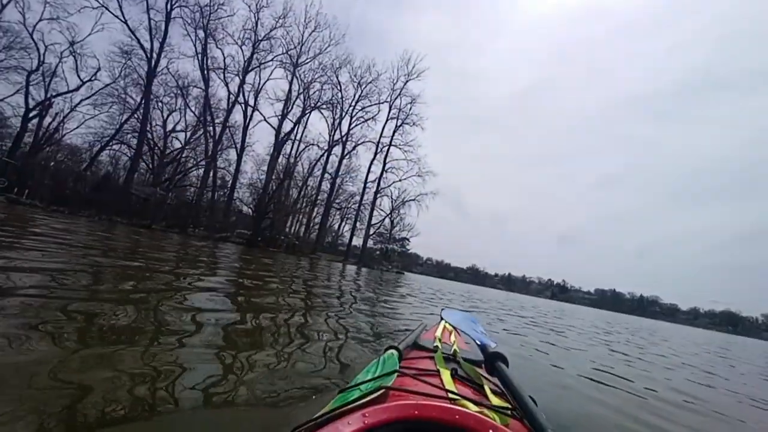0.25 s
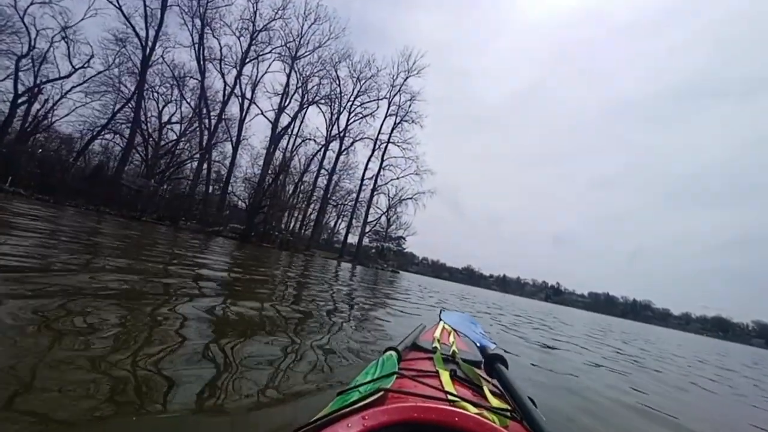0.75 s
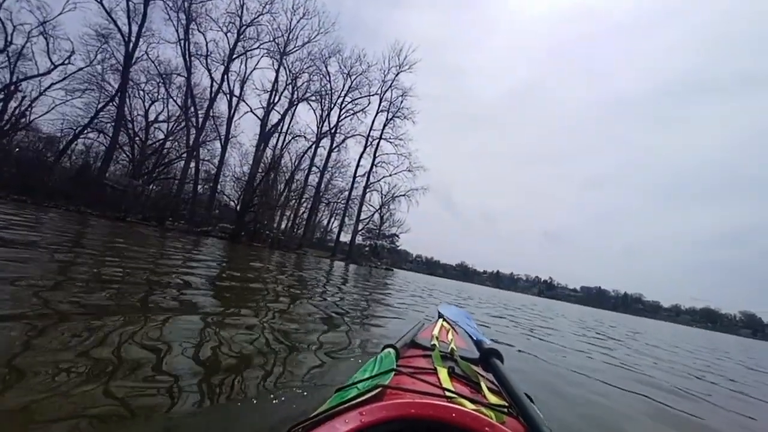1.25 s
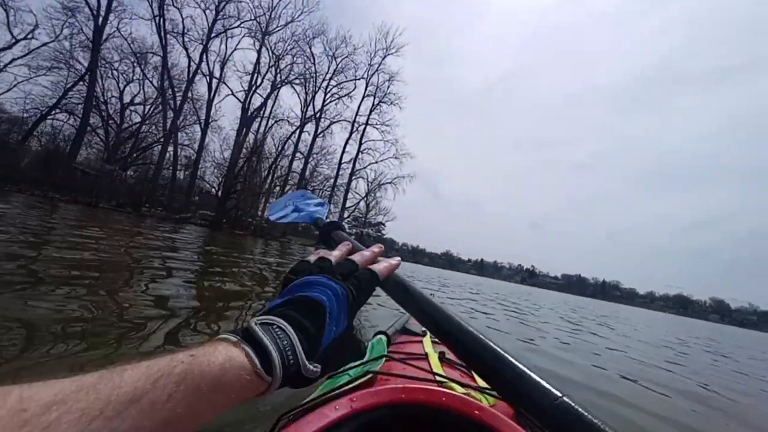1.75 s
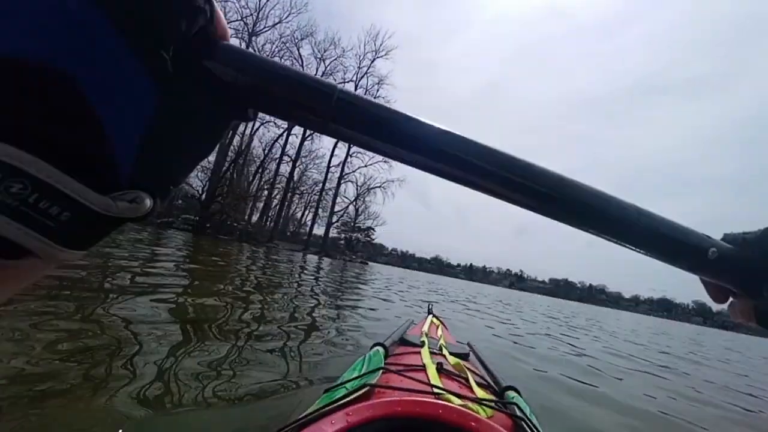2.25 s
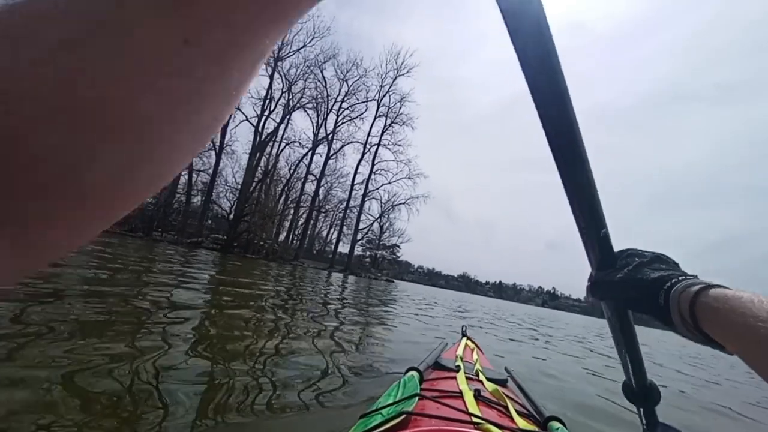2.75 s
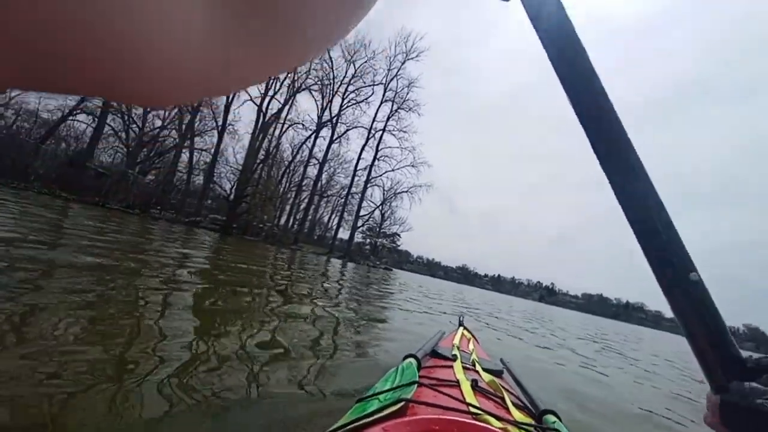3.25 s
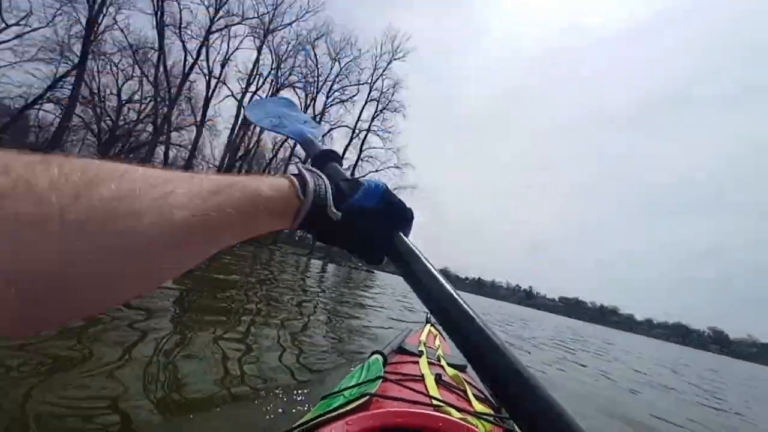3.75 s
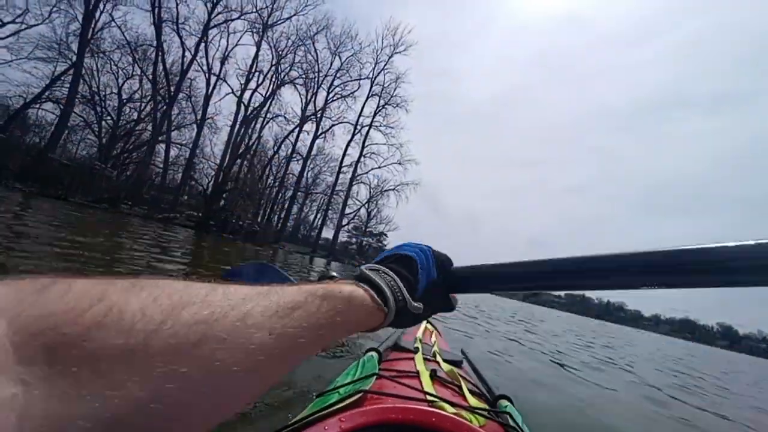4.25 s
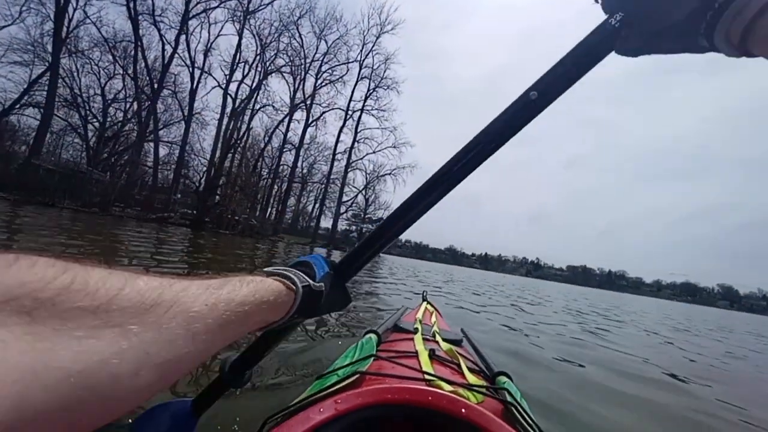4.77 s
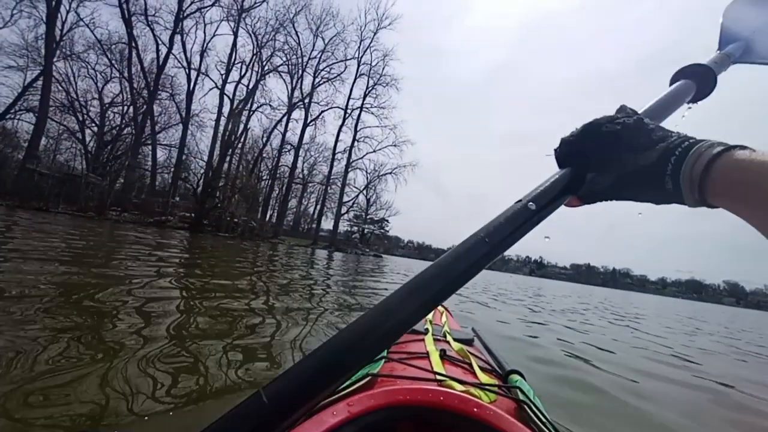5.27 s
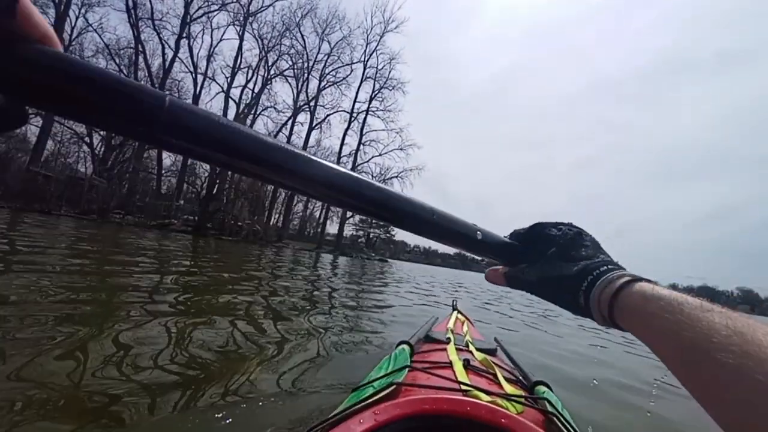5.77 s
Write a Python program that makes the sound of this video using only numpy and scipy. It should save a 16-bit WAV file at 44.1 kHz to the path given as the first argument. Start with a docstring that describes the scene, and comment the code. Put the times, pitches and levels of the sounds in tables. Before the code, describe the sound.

One sharp, rattling knock on a kayak hull, followed by soft paddle strokes with bubbling and drips, rustling clothes and a brief bird call.

```python
"""A kayak on a calm lake, heard by two small microphones on either side of the paddler's head.
From the start, clothing rustles and ticks over a far, low rumble. The paddle shaft soon bumps the plastic
deck, then knocks it hard and rattles. Near 2.7 s the blade enters on the left, splashing, gurgling and
dripping, while a bird calls a high note and a lower one from the shore trees.
Near 4.9 s a second stroke begins on the right."""
import sys
import numpy as np
from scipy import signal
from scipy.fft import rfft, irfft
from scipy.io import wavfile
from scipy.ndimage import uniform_filter1d

SR = 44100
rng = np.random.default_rng(int(sys.argv[2]) if len(sys.argv) > 2 else 0)


def dump_mix(stems):
    """Bounce the given channels to the path in sys.argv[1] as a 16-bit WAV at rate SR."""
    frames = np.atleast_2d(stems).T  # one column per channel
    limited = np.clip(frames, -1, 1)  # hard clip at full scale
    pcm = np.round(limited * 32767).astype(np.int16)
    wavfile.write(sys.argv[1], SR, pcm)


N = 265041

# How strongly the water churns round the blade, one list per stroke: time_s, level_db
STROKES = [
    [(2.74, -60), (2.8, -44), (3.2, -70), (3.27, -42.5), (3.6, -42), (3.72, -40), (3.82, -44.5),
     (4.12, -46.5), (4.22, -52), (4.35, -56)],
    [(4.9, -56), (5.07, -40.5), (5.2, -50), (5.42, -47.5), (5.68, -51.5), (6.01, -48.5)],
]


def undb(db):
    return 10 ** (np.asarray(db) / 20)


def unit(x):
    return x / np.sqrt(np.mean(x ** 2))


def on_log_hz(points, hz):
    point_hz, values = np.transpose(points)
    return np.interp(np.log(hz), np.log(point_hz), values)


def band(x, low_hz, high_hz):
    return signal.sosfilt(signal.butter(2, [low_hz, high_hz], "band", fs=SR, output="sos"), x)


def curves(table):
    """A curve for each column after time, then a gate that is 1 during the table and 0 outside it."""
    times, *columns = np.transpose(table)
    t = np.arange(N) / SR
    gate = uniform_filter1d(1. * (t > times[0]) * (t < times[-1]), size=300)
    return [np.interp(t, times, column) for column in columns] + [gate]


def wander(rate_hz):
    """A smooth random curve that strays about 1 either side of zero."""
    hold = int(SR / rate_hz)
    steps = np.repeat(rng.standard_normal(N // hold + 1), hold)
    return 1.3 * uniform_filter1d(uniform_filter1d(steps, hold), hold)[:N]


def place(out, sound, start_s, left_db):
    """The far ear gets a sound weaker and later; left_db is the left level minus the right."""
    lag_s = .00054 * np.clip(left_db / 4, -1, 1)
    for ear, sign in enumerate((1, -1)):
        first = int((start_s + max(-sign * lag_s, 0)) * SR)
        row = np.atleast_2d(sound)[-ear]
        out[ear, first:first + len(row)] += row[:max(N - first, 0)] * undb(min(sign * left_db, 0))


def burst(fade_ms):
    """Noise, different in each ear, that starts at once. A fade time is the time to drop by 60 dB."""
    t = np.arange(min(int(fade_ms * SR / 1000) + 8, 4000)) / SR
    fade = 1000 ** (-t * 1000 / fade_ms)
    noise = rng.standard_normal((2, 4000))[:, :len(t)] * fade
    return noise * np.sqrt(np.sum(fade ** 2) / np.sum(noise ** 2, axis=1, keepdims=True))


def rumble():
    """Far traffic and air: bands of low noise that swell together and flicker alone."""
    # Balance of low and high: pitch_hz, relative_db
    spectrum = [(12, -45), (20, -13), (65, -1.5), (97, -3.5), (128, -2), (163, -4.5), (517, -14.5),
                (572, -18.5), (608, -15), (646, -16), (790, -37.5), (948, -20.5), (2500, -50), (3250, -62),
                (5500, -120)]
    # How alike the two ears are: pitch_hz, likeness (0 to 1)
    likeness = [(30, .7), (70, 0.82), (290, 0.85), (640, 0), (1400, 0)]
    out, swell, noise = 0, wander(1), rng.standard_normal((2, N))
    for hz in 22 * 2 ** np.arange(0, 7, 1 / 3):
        noise = np.roll(noise, SR // 4, axis=1)  # makes each band unrelated to its neighbours
        middle, side = band(noise, hz / 2 ** (1 / 6), hz * 2 ** (1 / 6))
        alike = np.clip(on_log_hz(likeness, hz), 0, 1)
        ears = np.sqrt(1 + alike) * middle + np.sqrt(1 - alike) * side * np.array([[1], [-1]])
        out += undb(on_log_hz(spectrum, hz) + 0.28 * swell + 0.55 * wander(10)) * ears
    return unit(out) * undb(-48)


def rustle():
    """Many tiny slips of cloth hiss and crackle; swishes swell over them and stop more quickly."""
    # Steady hiss of clothing and a film of water: time_s, left_db, right_db, dull_part_db
    steady_hiss = [(0, -58.5, -56.5, -3), (1.1, -58, -55.5, -2.5), (1.9, -57, -56, -8),
                   (2.3, -55, -55, -14), (2.8, -49, -45.5, -9), (3.4, -56, -53, -3), (4.0, -49, -52, -5),
                   (4.7, -56, -49, -9), (5.2, -49.5, -41.5, -4), (5.7, -52.5, -48, -7),
                   (6.01, -56, -47, -6.5)]
    # Single swishes of cloth or water: peak_s, length_s, left_db, right_db, dull_part_db
    swishes = [(0.14, 0.15, -48.5, -52, -9), (0.253, 0.12, -53, -51, -6), (0.645, 0.18, -51.5, -52, -4.5),
               (0.914, 0.44, -63, -51.5, -4), (1.304, .17, -41.5, -50, -16), (1.45, 0.1, -53.5, -59, -11),
               (1.72, 0.21, -50.5, -67, -19), (2.061, 0.18, -51, -47, -3.5), (2.32, 0.13, -56.5, -50.5, -5),
               (2.49, 0.27, -60, -46.5, -6.5), (2.792, 0.073, -50, -51, -2), (3.132, 0.41, -67, -47, -17),
               (3.338, 0.063, -48, -58, 0), (3.553, 0.29, -50, -60, 7), (3.7, 0.2, -62, -46.5, -9),
               (3.85, 0.11, -47, -59, 3.5), (4.198, 0.14, -53, -58, -7), (4.6, 0.15, -51, -61, -14),
               (5.022, 0.3, -57, -44, -2), (5.102, 0.15, -52, -39.5, 1), (5.332, .22, -46, -39, -10),
               (5.544, 0.35, -50, -45, -11), (5.85, 0.2, -52.5, -45, -3)]
    t = np.arange(N) / SR
    left_db, right_db, dull_db, _ = curves(steady_hiss)
    power = undb([2 * left_db, 2 * right_db])
    dull_power = power * undb(2 * dull_db)
    for peak_s, length_s, left_db, right_db, dull_db in swishes:
        width_s = length_s * np.where(t < peak_s, 0.34, 0.24)
        swell = np.exp(-((t - peak_s) / width_s) ** 2) * undb([[2 * left_db], [2 * right_db]])
        power += swell
        dull_power += swell * undb(2 * dull_db)
    hiss = unit(band(rng.standard_normal((2, N)), 2810, 21600))
    hiss *= undb(2.27 * np.array([wander(36), wander(40)]))
    slips = rng.random((2, N)) < 160 / SR  # about 160 a second
    slips = slips * undb(np.minimum(4.1 * rng.exponential(size=(2, N)), 11))
    fading_slips = signal.lfilter([1], [1, -.95], slips)
    crackle = band(fading_slips * rng.standard_normal((2, N)), 2300, 17000)
    bright = undb([[3.5], [1.5]]) * hiss + undb(4.5) * crackle
    dull = unit(band(rng.standard_normal((2, N)), 260, 1900)) * undb(1.5 * wander(70))
    return np.sqrt(power) * bright + np.sqrt(dull_power) * dull


def ticks_and_splashes():
    """Drops land and cloth snaps: small hard drops are bright and brief, larger ones dull."""
    # Single drops and snaps: start_s, level_db, left_db, treble_db
    ticks = [(0.2094, -32, -4, 11), (0.24, -33, -10, 11), (0.9005, -43, -18, -7), (1.0836, -37.5, 9, -14),
             (2.3002, -32, 4.5, -5), (2.6112, -35, 12, 7), (2.6717, -24.5, 6, 2), (2.7859, -29, 10, -16),
             (3.0517, -29, 17, -23), (3.135, -31, 10, -11), (3.1467, -15.5, 9, 7), (3.3445, -28, 18, -17),
             (3.387, -34.5, 13, -6), (3.4944, -32.5, 10, -14), (3.5355, -29.5, 7, -12), (3.55, -18, 16, 13),
             (3.588, -27, 14, -17), (3.6136, -30.5, 12, -9), (3.657, -28, 19, -18),
             (3.6611, -15.5, -18, 19), (3.7028, -33, -16, 3), (3.717, -31, 13, -10), (3.8024, -25, -22, 18),
             (3.81, -32, 20, -17), (3.8732, -18, 21, 24), (3.9624, -24, 12, 11), (4.0155, -30, -4, 10),
             (4.114, -25, 17, -3), (4.1822, -30.5, -1.5, -4), (4.202, -21, 25, -23), (4.2987, -34, -17, 8),
             (4.5977, -32, -7, 12), (4.6729, -30.5, 19, -6), (5.3634, -25.5, -12, 0), (5.5603, -18, 12, 9),
             (5.749, -32, -14, 15), (5.9343, -22.5, -25, -25), (5.972, -28, -25, 15),
             (5.9948, -27.5, 4, -14)]
    # Splashes of three quick hits each: start_s, length_s, level_db, left_db, treble_db
    splashes = [(2.6083, .003, -38, 10, -20), (2.7541, 0.0082, -22, 3.5, -4.5),
                (3.8324, .014, -28.5, 15, -2.5), (4.199, .004, -39.5, 25, -20),
                (5.79, .012, -36.5, 10, -15)]
    hits = [(start_s, level_db, left_db, treble_db, 5.7 * (1 - .008 * treble_db))
            for start_s, level_db, left_db, treble_db in ticks]
    hits += [(start_s + length_s * part, level_db, left_db, treble_db, 17.5)
             for start_s, length_s, level_db, left_db, treble_db in splashes for part in (0, .5, 1)]
    middle, treble = np.zeros((2, 2, N))
    for start_s, level_db, left_db, treble_db, fade_ms in hits:
        hit = burst(fade_ms) * undb(level_db) / np.sqrt(1 + undb(2 * treble_db))
        place(middle, hit, start_s, left_db)
        place(treble, hit * undb(treble_db), start_s, left_db)
    middle = band(band(middle, 3700, 9400), 3600, 9700)
    treble = band(band(treble, 9500, 16600), 8900, 21000)
    return undb(7) * (middle + treble)


def deck_knocks():
    """Each blow of the shaft is a smooth push that rings the hull; the hard one also rattles."""
    # Blows on the deck: start_s, peak_db, contact_ms, low_cut_hz
    blows = [(0.2641, -29.5, 5.4, 40.3), (0.4088, -0.5, 0.37, 270)]
    # Tones the hull rings with: pitch_hz, relative_db, fade_s
    hull_tones = [(98, -5.5, 0.13), (341, 8.5, .1), (455, -1.5, 0.043), (770, -3, 0.069), (983, -8.5, 0.15),
                  (1240, 7, 0.026), (2740, -16, 0.12), (3100, -17, 0.11), (3380, -26, 0.1)]
    # The shaft chattering after the hard blow: start_s, level_db, fade_ms
    rattles = [(.4092, -10, 41), (.4152, -9.5, 12.6), (.4172, -17, 10), (.4092, -15, 78)]
    out, t = np.zeros((2, N)), np.arange(SR // 5) / SR
    ring = sum(undb(db) * np.cos(2 * np.pi * hz * t) * 1000 ** (-t / fade_s)
               for hz, db, fade_s in hull_tones)
    ring[0] *= 14  # the contact itself clicks
    for start_s, peak_db, contact_ms, low_cut_hz in blows:
        push = np.sin(np.pi * np.clip(t[:600] * 1000 / contact_ms, 0, 1)) ** 2
        knock = band(np.convolve(ring, push), low_cut_hz, 10000)
        place(out, -knock / np.abs(knock).max() * undb(peak_db), start_s, left_db=-.5)
    for start_s, level_db, fade_ms in rattles:
        place(out, band(burst(fade_ms), 1100, 11300) * undb(level_db), start_s, left_db=2.5)
    return out


def blade_side(time_s):
    # Which side the blade is heard on: time_s, left_db
    path = [(2.76, 1), (3.0, 8.5), (3.3, 15), (3.47, 13), (3.53, 5.5), (4.2, 6.5), (4.9, -3.5), (5.42, -11),
            (5.58, 7)]
    return np.interp(time_s, *np.transpose(path))


def churn_events(per_second):
    """Random moments in the strokes: start_s, level_db and three random numbers from 0 to 1."""
    for stroke in STROKES:
        times, levels = np.transpose(stroke)
        length_s = times[-1] - times[0]
        for when, *chances in rng.random((int(per_second * length_s), 4)):
            start_s = times[0] + when * length_s
            yield start_s, np.interp(start_s, times, levels), *chances


def spray():
    """The churning throws fine droplets; each ticks in its own narrow band of pitch."""
    out = np.zeros((2, N))
    for start_s, level_db, size, side, hardness in churn_events(per_second=190):
        hz = 2400 * 2 ** (2.56 * hardness)
        droplet = band(burst(fade_ms=12 - 7 * hardness), hz / 1.15, hz * 1.09)
        droplet *= undb(level_db + 8.5 + 12.1 * size ** 2.8)
        place(out, droplet, start_s, 0.78 * blade_side(start_s) + 30 * (side - .5))
    return out


def bubble(hz, fade_ms, glide, waver=0.055, slap_db=-9):
    """A slap starts trapped air ringing: a dying, wavering tone that slides as the bubble rises."""
    t = np.arange(int(fade_ms * SR / 1000)) / SR
    speed, offset = rng.random(2)
    wobble = np.sin(2 * np.pi * ((30 + 60 * speed) * t + offset))
    pitch_hz = hz * 2 ** (glide * t) * (1 + waver * wobble)
    loudness = 1000 ** (-t * 1000 / fade_ms) * (1 - np.exp(-t / .00089))
    ring = np.sin(2 * np.pi * np.cumsum(pitch_hz) / SR) * loudness
    slap_cycles = t * hz * 1.57
    return ring + undb(slap_db) * np.sin(2 * np.pi * slap_cycles) * (slap_cycles < 1)


def gurgle():
    """The churning blade traps air: loud bubbles one by one, and a random crowd of small ones."""
    # The loudest bubbles: start_s, level_db, pitch_hz, fade_ms, glide_octaves_per_s
    loud_bubbles = [(2.753, -32, 441, 92, 2), (2.756, -27, 620, 41, 6), (2.761, -19.5, 2020, 10.4, 0),
                    (3.007, -30, 773, 164, 5), (3.028, -34, 970, 74, -4), (3.052, -47, 830, 90, 22),
                    (3.129, -37.5, 827, 66, 41.5), (3.254, -40, 848, 41, 26), (3.269, -30.5, 1200, 47, -8),
                    (3.299, -40, 885, 42, 22), (3.325, -31.5, 970, 64, -1), (3.356, -43, 643, 230, 11.5),
                    (3.404, -40.5, 692, 80, -5), (3.412, -38, 928, 230, 7), (3.444, -32.5, 1720, 40, 1),
                    (3.475, -38, 1220, 62, 0), (3.504, -40, 442, 130, 6.5), (3.518, -33, 1010, 100, 3),
                    (3.536, -26.5, 427, 84, 8.5), (3.552, -30, 1270, 49, 3), (3.571, -30, 587, 100, 2),
                    (3.655, -36, 978, 310, 5), (3.685, -35, 360, 27, -9), (3.715, -26, 890, 38, 6),
                    (3.752, -33, 776, 41, 0), (3.765, -29, 950, 115, 8.5), (3.82, -33, 1970, 39, 21),
                    (3.852, -31, 1120, 37, 7), (3.905, -32.5, 1040, 42, -13), (3.963, -29.5, 786, 94, -2),
                    (4.075, -40, 960, 93, 18), (4.107, -37, 1530, 38, 0), (4.135, -41, 1250, 35, 5),
                    (4.18, -34, 1205, 26, 0), (4.275, -39.5, 1000, 40, 5), (4.466, -22.5, 7520, 12.5, -3),
                    (4.566, -28, 4100, 17, 21), (4.606, -34, 1500, 5, 0), (4.586, -39, 6170, 15, 0),
                    (4.651, -37, 6200, 15, 0), (4.94, -36.5, 540, 130, 2), (4.941, -36.5, 1660, 37, -6),
                    (5.087, -32.5, 420, 64, 2), (5.245, -34.5, 430, 37, 4), (5.318, -36, 628, 48, 0),
                    (5.355, -33.5, 940, 47, 2), (5.357, -28.5, 2000, 17, 9), (5.415, -40.5, 1054, 150, 0.5),
                    (5.44, -44, 1910, 37, 7), (5.579, -26.5, 2560, 39, 6), (5.582, -29, 4970, 20, 4),
                    (5.79, -25.5, 4900, 30, 3), (5.803, -31.5, 5820, 24, -5)]
    out = np.zeros((2, N))
    for start_s, level_db, hz, fade_ms, glide in loud_bubbles:
        left_db = blade_side(start_s)
        plop = bubble(hz, fade_ms, glide, slap_db=5 - 0.22 * fade_ms)
        place(out, plop * undb(level_db + abs(left_db) / 2), start_s, left_db)
    for start_s, level_db, softness, highness, ringing in churn_events(per_second=260):
        hz = 500 * 2 ** (2.9 * highness ** 1.1)
        fade_ms = 1000 * (4 + 45 * ringing ** 2.65) / hz  # 4 to 49 cycles
        plop = bubble(hz, fade_ms, glide=700 * (ringing - .35) / fade_ms, waver=0.11)
        plop *= undb(level_db + 1.5 - 4.54 * np.log(softness + .05) - 4 * highness)
        place(out, plop, start_s, 0.61 * blade_side(start_s))
    return out


def bird():
    """A whistle made hoarse by a fast pitch wobble, smeared by echoes from the trees."""
    # The call, one list per note: time_s, pitch_hz, level_db, wobble_hz
    notes = [
        [(2.83, 6030, -43, 300), (2.854, 6370, -42.5, 332), (2.912, 6460, -47, 250), (2.95, 6290, -44, 190),
         (3.0, 6350, -51.5, 200), (3.07, 6340, -64, 200)],
        [(3.01, 4900, -60, 252), (3.05, 4520, -50, 330), (3.08, 4280, -46, 258), (3.135, 4165, -40.5, 80),
         (3.19, 4067, -45.5, 55), (3.23, 4154, -50, 45), (3.3, 4124, -59, 45), (3.45, 4100, -68, 45)],
    ]
    voice = 0
    for note in notes:
        hz, level_db, wobble_hz, gate = curves(note)
        phase = 2 * np.pi * np.cumsum(hz + wobble_hz * wander(1100)) / SR
        octave = (hz < 5200) * wobble_hz / 400  # low note only: the hoarser, the stronger
        whistle = np.sin(phase) + octave * np.sin(2 * phase)
        voice += gate * undb(level_db + 2.1 * wander(250)) * whistle
    echoes = signal.fftconvolve(voice[None], burst(fade_ms=84) * undb(-17.5))[:, :N]
    return 0.82 * voice + echoes


def scene():
    return rumble() + rustle() + ticks_and_splashes() + deck_knocks() + spray() + gurgle() + bird()


def record(dry):
    """Each microphone's opening rings at its own pitch; the treble above 15900 Hz is cut."""
    # Tone colour of each opening, left then right: pitch_hz, gain_db
    openings = [
        [(1500, -4), (3000, -7), (5000, -8), (6600, 4.5), (8300, -8.5), (11000, -3), (13000, -11.5),
         (16000, -8)],
        [(1500, -4), (3000, -4.5), (5200, -9), (7100, -3), (8000, 3.5), (9000, -5), (10200, -9.5),
         (11500, -5.5), (14300, -1.5), (16000, -6)],
    ]
    hz = np.maximum(np.arange(257) * SR / 512, 1)
    out = np.empty_like(dry)
    for ear, opening in enumerate(openings):
        gain = undb(on_log_hz([(700, 0.0098)] + opening, hz))
        # Turn the gains into a ring that comes only after each sound (a minimum-phase filter).
        cepstrum = irfft(np.log(gain))
        cepstrum[1:256] *= 2
        cepstrum[257:] = 0
        ring = irfft(np.exp(rfft(cepstrum)))
        out[ear] = signal.fftconvolve(dry[ear], ring)[:N]
    return signal.sosfilt(signal.ellip(10, .2, 90, 15900, fs=SR, output="sos"), out)


dry = scene()
out = record(dry)
dump_mix(out)
```